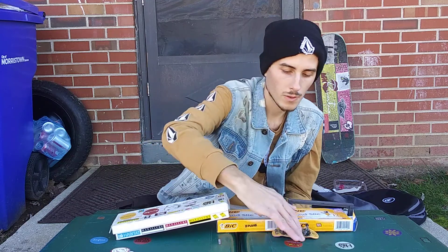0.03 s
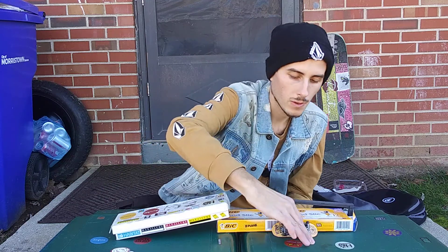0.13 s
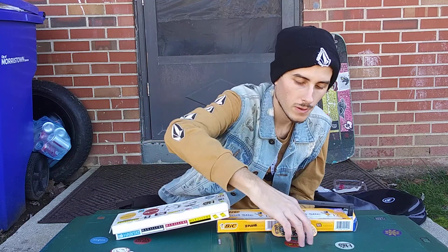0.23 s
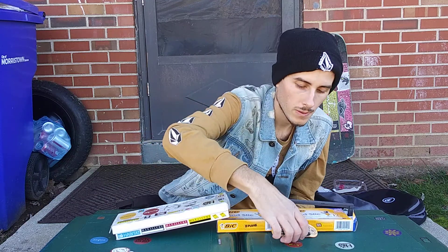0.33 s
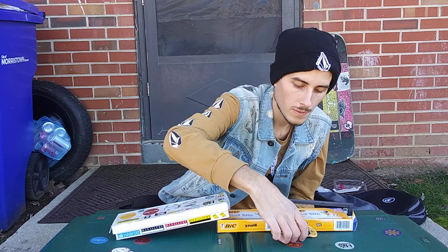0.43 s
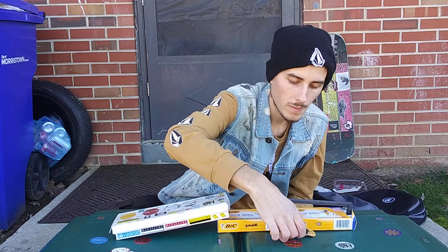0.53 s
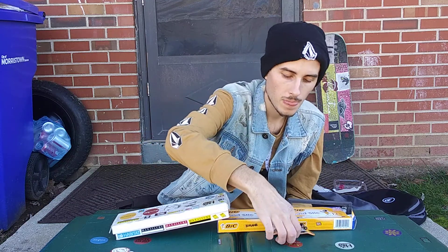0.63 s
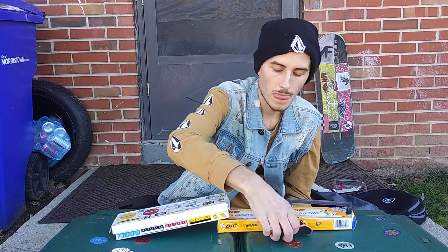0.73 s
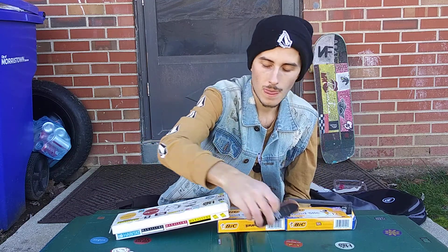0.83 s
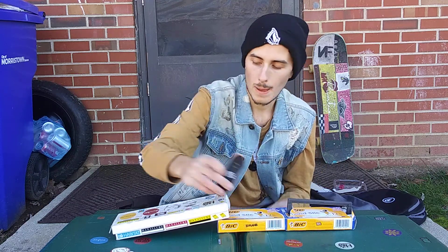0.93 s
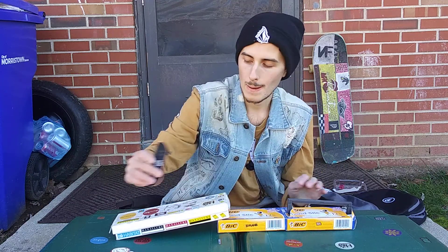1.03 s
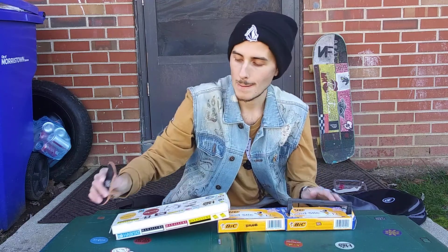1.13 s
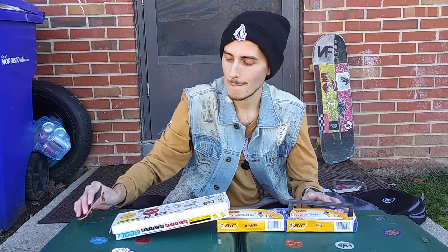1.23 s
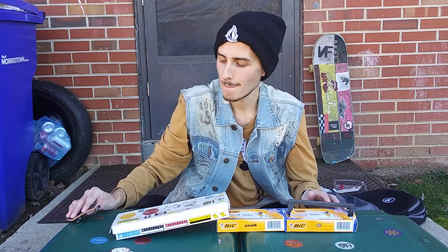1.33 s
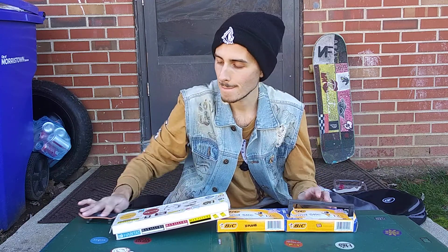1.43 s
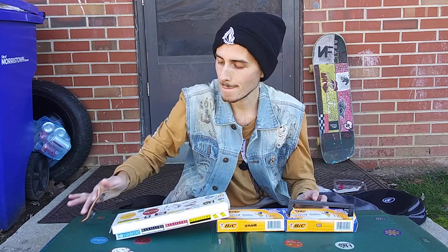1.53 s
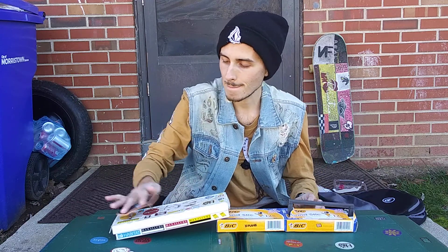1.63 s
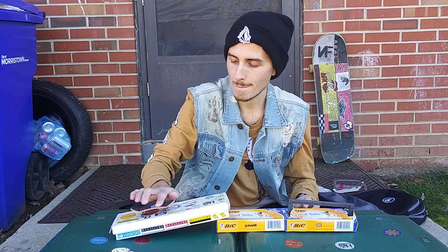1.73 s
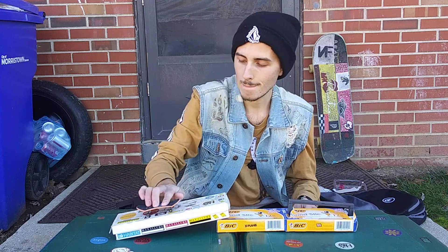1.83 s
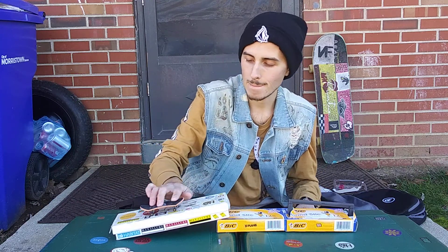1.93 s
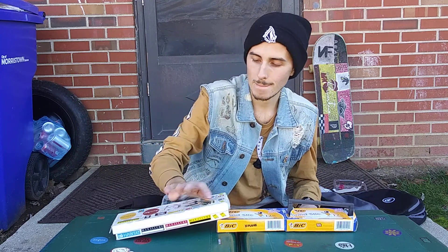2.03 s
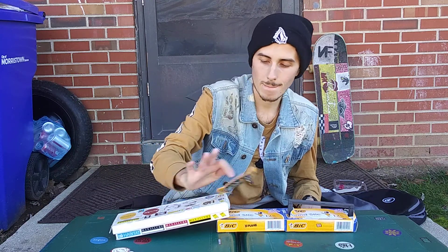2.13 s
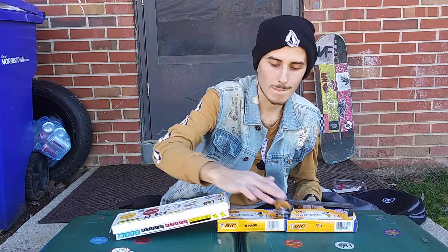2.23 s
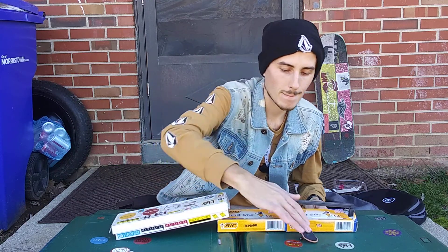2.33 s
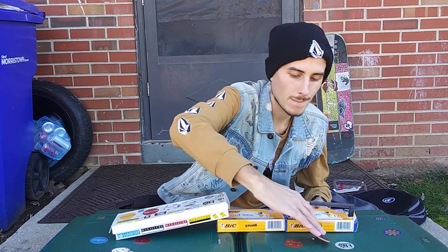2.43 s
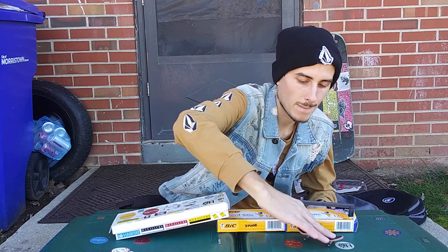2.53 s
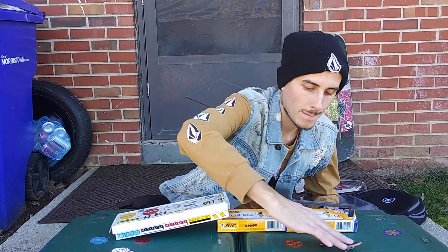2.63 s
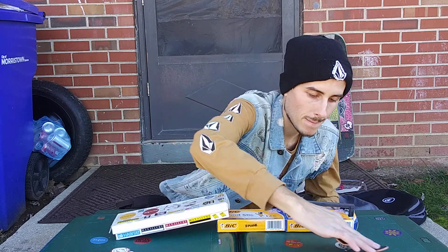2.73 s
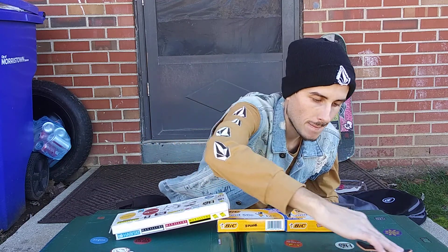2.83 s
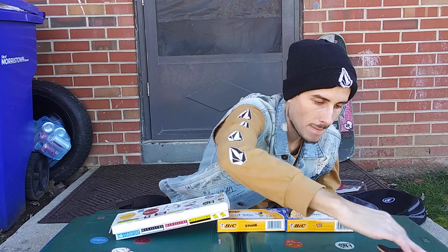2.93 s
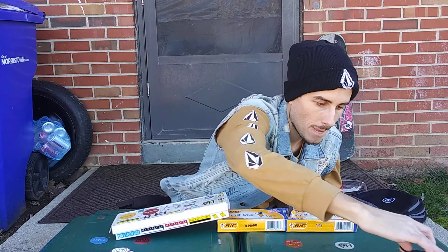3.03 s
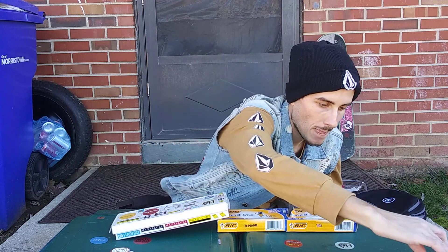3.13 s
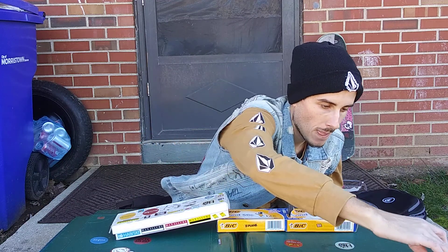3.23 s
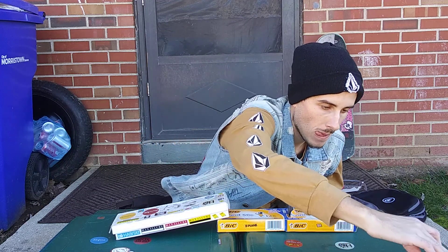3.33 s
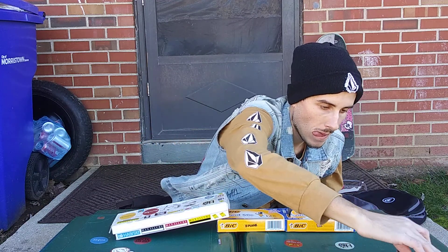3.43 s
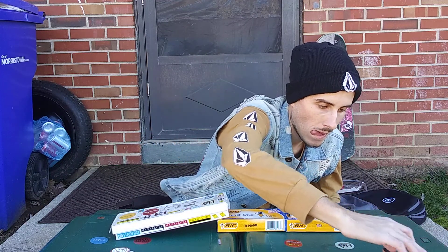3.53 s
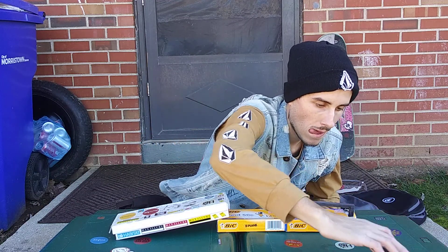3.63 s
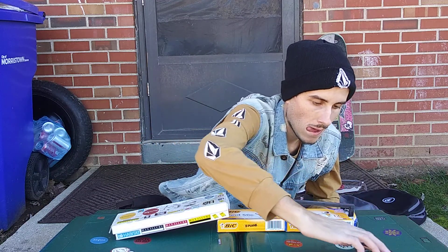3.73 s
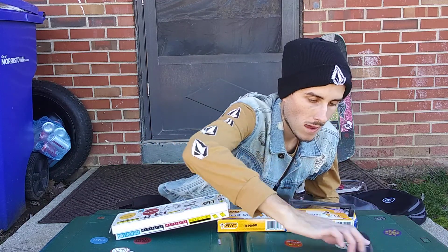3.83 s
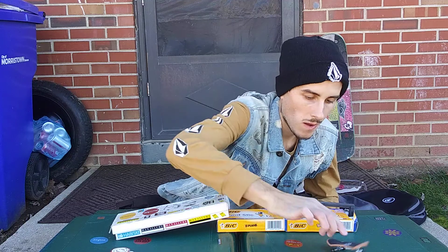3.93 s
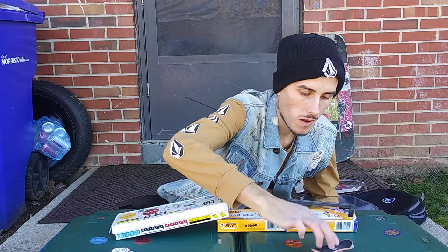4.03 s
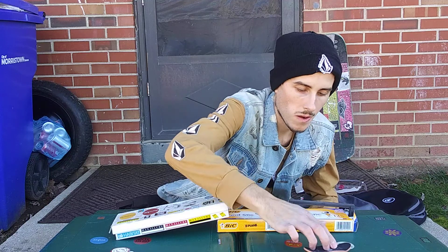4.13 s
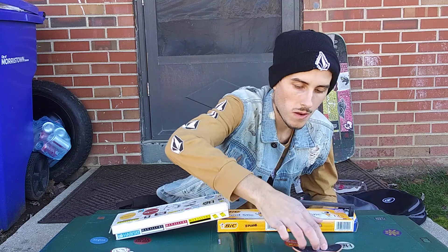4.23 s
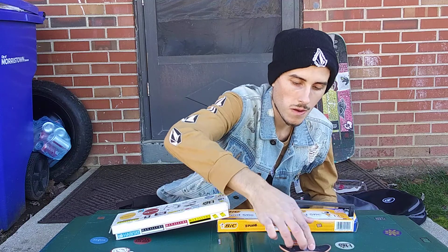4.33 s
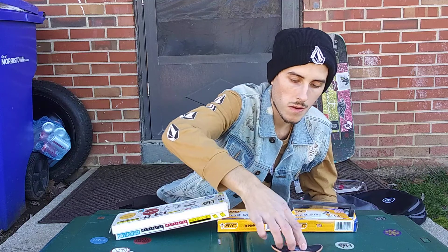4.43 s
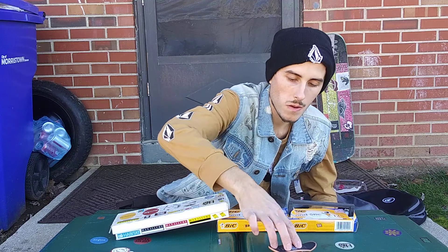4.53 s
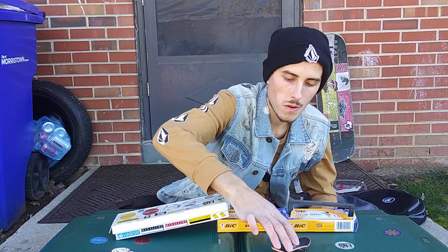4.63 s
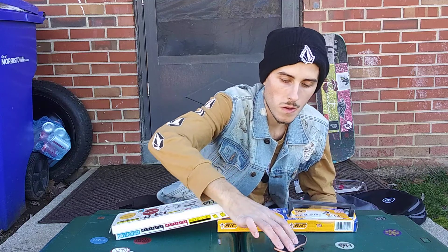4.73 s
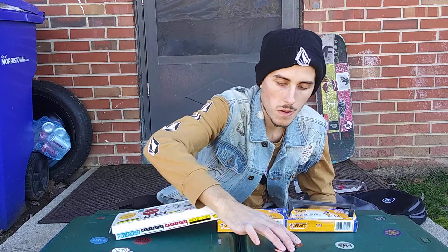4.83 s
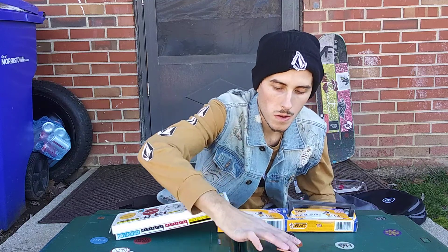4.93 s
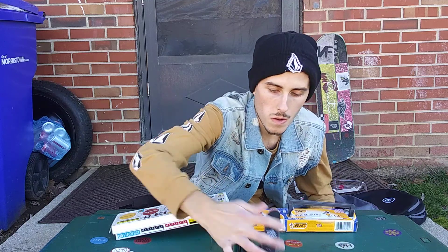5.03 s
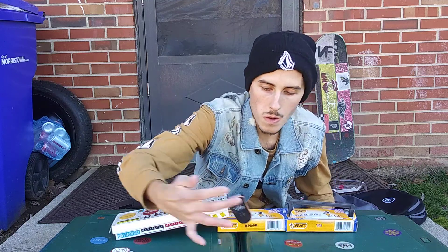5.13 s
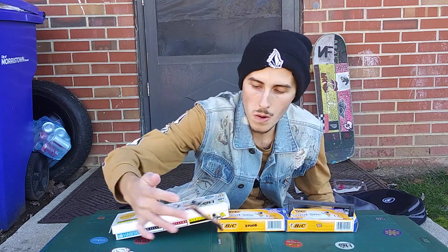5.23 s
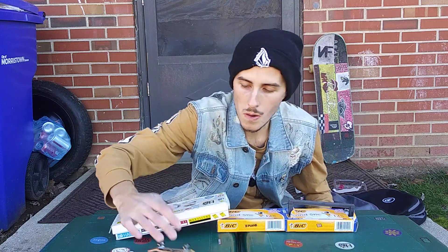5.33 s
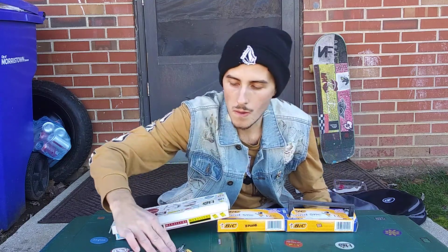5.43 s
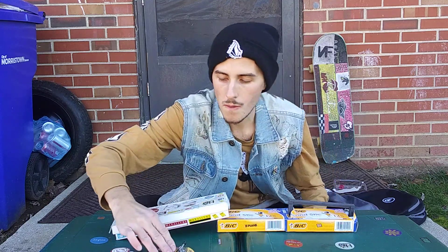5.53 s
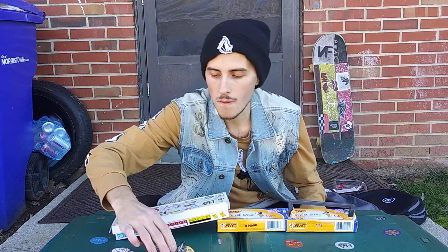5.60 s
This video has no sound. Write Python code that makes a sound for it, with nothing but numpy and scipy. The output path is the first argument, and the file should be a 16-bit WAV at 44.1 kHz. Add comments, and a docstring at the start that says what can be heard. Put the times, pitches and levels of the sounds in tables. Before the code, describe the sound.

Sharp dry clicks and hollow knocks of a fingertip-driven toy skateboard, broken by short gritty rolls, on a quiet porch with faint chirps.

```python
"""On a porch, a toy skateboard is flicked, slid and rolled over a hollow plastic lid and cardboard boxes.
Each blow is a sharp contact with a dying rattle that rings lid, box, deck and axles as sums of modes.
Rolling and scuffing drive the same bodies with continuous grit. Brick walls return a short echo.
Small birds whistle as gliding sines; a far motor hums and drones over a wash of shaped noise."""
import sys
import numpy as np
from scipy import signal
from scipy.fft import rfft, irfft
from scipy.io import wavfile
from scipy.ndimage import uniform_filter1d

SR = 44100
rng = np.random.default_rng(int(sys.argv[2]) if len(sys.argv) > 2 else 0)


def wav_record(signal):
    """Record a signal, one row per channel, as 16-bit PCM in the file named by sys.argv[1]."""
    frames = np.transpose(np.atleast_2d(signal))
    bounded = np.clip(frames, -1, 1)
    # unit amplitude maps onto the largest positive 16-bit level
    quanta = np.round(bounded * 32767).astype(np.int16)
    wavfile.write(sys.argv[1], SR, quanta)


N = 249862
SPAN = 8192  # samples in each body's answer

# damped modes of the hollow plastic lid: pitch_hz, level_db, t60_s
LID = [(150, -5, .08), (216, 0, .09), (281, 0, .09), (340, -4, .06), (385, -2, .07), (440, -4, .06)]
# damped modes of the cardboard box: pitch_hz, level_db, t60_s
BOX = [(525, 0, .06), (620, -2, .045), (700, -5, .04), (800, -1, .045), (940, -1, .04), (1050, -3, .035)]
# damped modes of the board's deck: pitch_hz, level_db, t60_s
DECK = [(1300, -4, .022), (1490, -1, .022), (1750, -3, .02), (1930, -3, .02), (2200, -1, .02),
        (2480, -2, .018), (2700, -3, .016), (3100, -1, .014), (3500, -1, .012), (3900, -3, .01),
        (4250, -5, .008)]
# damped modes of the metal axles: pitch_hz, level_db, t60_s
AXLES = [(5400, -1, .012), (5900, -4, .008), (6600, -1, .008), (7150, 0, .008), (7800, -3, .006),
         (8500, -5, .005)]
# damped modes of the smallest parts: pitch_hz, level_db, t60_s
TICK = [(10090, -8, 0.0033), (11050, -22, .01), (14600, -22, 0.014), (15800, -9, .012)]
# the five sounding bodies, lid to tick: modes, low_edge_hz, high_edge_hz
BODIES = [(LID, 130, 480), (BOX, 480, 1100), (DECK, 1100, 4400), (AXLES, 5000, 9300), (TICK, 9500, 16000)]
# basic level of the unringing crack in each body's answer, lid to tick: level_db
CRACK_LEVELS = [-21, -7.5, -2.5, -11.5, 3.5]


def undb(db):
    """Decibel law: an amplitude gain from its level."""
    return 10 ** (np.asarray(db) / 20)


def level(x, rms_db):
    """Mean-square power: scale a signal to a given rms."""
    return x * undb(rms_db) / np.sqrt(np.mean(x ** 2))


def fade(t60_s, count):
    """Exponential damping: a fall of 60 dB in each t60, one row for each."""
    t60_s = np.maximum(np.reshape(t60_s, (-1, 1)), 1e-3)
    return np.exp(-np.log(1000) * np.arange(count) / SR / t60_s)


def walk(rate_hz):
    """Slow random modulation: normal draws at the given rate joined by straight slopes."""
    hold = int(SR / rate_hz)
    steps = np.repeat(rng.standard_normal(N // hold + 1), hold)
    return uniform_filter1d(steps, hold)[:N]


def grit(shape, spread_db):
    """Rough contact: a random click on every sample, most small, a few large."""
    return rng.standard_normal(shape) * undb(spread_db * rng.exponential(size=shape))


def favour(hz, spot_hz, spot_db, width):
    """Modal coupling: extra strength of the modes near the pitch that a contact spot drives best."""
    return spot_db * np.exp(-(np.log(hz / spot_hz) / width) ** 2)


def ring(body, mode_db, crack_db):
    """Modal superposition: spectra of a body's answer to a click, one row for each set of mode levels."""
    modes, low_hz, high_hz = body
    hz, db, t60_s = np.transpose(modes)
    t = np.arange(SPAN) / SR
    sines = np.cos(2 * np.pi * hz[:, None] * t) * fade(t60_s, count=SPAN)
    sines /= np.sqrt(np.sum(sines ** 2, axis=1, keepdims=True))
    edges = signal.butter(3, [low_hz, high_hz], "bandpass", fs=SR, output="sos")
    band = signal.sosfreqz(edges, np.fft.rfftfreq(SPAN, 1 / SR), fs=SR)[1]
    # the unringing crack is a bare click, made up for the energy that the band removes
    crack = undb(crack_db + 10 * np.log10(SR / (high_hz - low_hz)))
    return band * (rfft(undb(db + mode_db) @ sines) + crack)


def blows():
    """Impact excitation: a sharp contact and a dying rattle drive every body; each spot favours other modes."""
    # blows of the board; body levels are against the deck: start_s, deck_peak_db, lid_db, box_db,
    # axles_db, tick_db, strongest_deck_ring_hz, strongest_hollow_ring_hz, rattle_t60_s
    blow_table = [(0.0229, -5, -10, -14, -11, -27, 1570, 370, 0.024),
                  (0.0561, -9, -6.5, -14.5, -6, -17.5, 2300, 207, 0.01),
                  (0.1244, -47, -12, -5, -21, -34, 1250, 1060, 0.034),
                  (0.1845, -20, -25, -10, -22, -31, 1280, 895, 0.02),
                  (0.2816, -38, -21, -5, -27, -42, 1440, 226, 0.016),
                  (0.3334, -46, -3, -3.5, -17, -33, 1150, 215, 0.037),
                  (0.3869, -49, 1, -10, -30, -32, 1105, 202, 0.037),
                  (0.4592, -50, 3.5, -3, -21, -32, 1270, 229, 0.054),
                  (0.568, -41.5, 3, 2, -7, -19, 2600, 285, 0.024),
                  (0.664, -49.5, -8, -3, -28, -32, 1350, 248, 0.03),
                  (0.7132, -33, -13, -15, -18, -44, 1260, 1010, 0.058),
                  (0.7674, -49.5, 0, -1, -19, -27, 1730, 237, 0.016),
                  (0.82, -30.5, -11.5, -13.5, -15, -26, 1080, 343, 0.022),
                  (0.8681, -61.5, 1.5, -11, -3, -24.5, 2240, 240, 0.03),
                  (0.963, -65, 5, -8, -5, -16, 1170, 236, 0.016),
                  (1.0526, -64, -5, -13, 14.5, -23, 1180, 237, 0.02),
                  (1.2486, -42.5, -13, -4.5, -8.5, -29, 2280, 1000, 0.055),
                  (1.2894, -51.5, -7, -3.5, -27, -29, 1280, 250, 0.032),
                  (1.392, -34.5, -20, -33, -1.5, -18, 1780, 482, 0.023),
                  (1.4396, -27.5, -12, -24, -16, -29, 3940, 452, 0.021),
                  (1.49, -17, -15, -12.5, -5.5, -20, 1750, 920, 0.063),
                  (1.5097, -20, -11, -5.5, -17, -24, 1830, 890, 0.074),
                  (1.5244, -11.5, -16.5, -13, -15, -27, 2130, 496, 0.04),
                  (1.569, -23.5, -15, -12, -12.5, -37, 1720, 1060, 0.056),
                  (1.584, -31, -20, -5, -11, -28, 1800, 437, 0.03),
                  (1.602, -19.5, -15.5, -34, -5, -22, 3130, 465, 0.011),
                  (1.708, -22, -18.5, -7, -9.5, -37, 2180, 950, 0.026),
                  (1.7259, -26, -10, 1, -8, -26, 2120, 910, 0.014),
                  (1.7411, -24.5, -6, 6, -10, -37, 1740, 528, 0.045),
                  (1.9007, -53, 3, 0.5, -29, -31.5, 1200, 235, 0.025),
                  (2.0597, -37, -14.5, 2.5, -26.5, -31.5, 1505, 638, 0.015),
                  (2.1, -38.5, -12, 4.5, -29, -34, 1580, 503, 0.014),
                  (2.1355, -32.5, -3, 12.5, -21.5, -36, 1130, 620, 0.059),
                  (2.3205, -17.5, -24, 0.5, -14.5, -26, 1300, 875, 0.03),
                  (2.3281, -14, -24.5, -19, -19, -36, 1110, 1048, 0.01),
                  (2.3655, -22, -18.5, -4.5, -14, -24, 1420, 770, 0.048),
                  (2.3792, -25.5, -12, 4.5, -7, -16, 1570, 912, 0.01),
                  (2.387, -13, -2, 0, -3, -12, 1770, 388, 0.019),
                  (2.4034, -24, -6, -0.5, -9.5, -19, 1580, 277, 0.058),
                  (2.4667, -30.5, -2, -8, -12.5, -21, 1200, 207, 0.043),
                  (2.5822, -36, 2, 3, -19, -12, 1100, 1020, 0.03),
                  (2.596, -10.5, -7, -10.5, -2.5, -15, 2700, 213, 0.017),
                  (2.7076, -34.5, 5.5, -13, -22, -37, 1500, 457, 0.017),
                  (3.0523, -36.5, -4, -8, 0.5, -3.5, 3370, 331, 0.055),
                  (3.0984, -34, -16, -26, -11, -18, 2350, 334, 0.022),
                  (3.1345, -38.5, -5, -14, -14, -31, 2160, 455, 0.09),
                  (3.1777, -34, -10, -20, -14.5, -29, 1680, 452, 0.04),
                  (3.236, -49, -10, -8.5, -7.5, -10, 1640, 240, 0.028),
                  (3.407, -50.5, -27, -21.5, -12, -24, 1600, 202, 0.035),
                  (3.4221, -31, -19.5, -15.5, -23.5, -26, 3370, 484, 0.02),
                  (3.4514, -49, -10, -13, -21, -34, 1720, 428, 0.033),
                  (3.5053, -39.5, -5, -9.5, -17.5, -29, 2470, 463, 0.09),
                  (3.5925, -48, -1, -8, -14, -28, 1910, 385, 0.054),
                  (3.6253, -37.5, -14, -7, -7, -19, 2250, 466, 0.038),
                  (3.6471, -26.5, -13, -22, -9.5, -17, 1930, 939, 0.03),
                  (3.8459, -38, -7.5, -24.5, -10, -35, 1340, 848, 0.043),
                  (3.9989, -33.5, -13, -11, -7, -20, 3640, 240, 0.056),
                  (4.0504, -11.5, -6.5, -7, -7.5, -18.5, 3900, 262, 0.02),
                  (4.0995, -17.5, -18, -14.5, -9, -20, 1770, 781, 0.017),
                  (4.1123, -28, -10, -7, -8, -15, 1750, 816, 0.088),
                  (4.133, -13, -12, -11.5, -9.5, -32, 4400, 277, 0.02),
                  (4.2032, -44, -32, 5, -14, -38, 1270, 880, 0.038),
                  (4.2097, -29, -14, -5, -21, -43, 1110, 850, 0.033),
                  (4.273, -46, -12, 4, -17, -36, 1470, 1080, 0.03),
                  (4.3804, -36, -29, 1.5, -11, -24, 1820, 910, 0.021),
                  (4.5998, -38.5, -7, -2, -21, -33, 2820, 961, 0.034),
                  (4.7694, -47.5, -11, -14, -28, -32, 2190, 238, 0.027),
                  (4.8468, -50, -10, -14, -23, -33, 1510, 203, 0.038),
                  (4.9771, -43, -24, -15, -2.5, -24, 1700, 232, 0.033),
                  (5.0714, -33, 3.5, -17, -2, -25, 1500, 384, 0.011),
                  (5.0859, -17.5, -10, -7.5, -7, -16, 1620, 420, 0.026),
                  (5.115, -17.5, -6, -19, -6.5, -28, 2200, 394, 0.014),
                  (5.3916, -23, -7.5, -6.5, -14, -25, 3530, 970, 0.048),
                  (5.4143, -10.5, -6.5, -19.5, -4, -16.5, 1800, 436, 0.024),
                  (5.4235, -24, 1.5, -4.5, -6.5, -22, 3220, 218, 0.073),
                  (5.4535, -32.5, -17, -26, 0, -14, 2700, 294, 0.015),
                  (5.4631, -13.5, -13, -9, -14, -22, 3280, 960, 0.062),
                  (5.474, -9, -10, -10, -7, -28, 2170, 202, 0.019),
                  (5.4917, -29.5, -11, 0, -0.5, -30, 2020, 536, 0.017)]
    start_s, deck_db, lid, box, axles, tick, deck_hz, hollow_hz, rattle_s = np.transpose(blow_table)
    # upper deck modes against lower ones: -6.5 dB at an 1800 Hz deck ring, rising 13 dB per octave
    hard_db = -6.5 + 13 * np.log2(deck_hz / 1800.0)
    # the loose board chatters on faintly beneath the first rattle
    shake = fade(rattle_s, count=SPAN) + undb(-24.0) * fade(0.087, count=SPAN)
    push = shake * grit((len(start_s), SPAN), 2.3)
    push[:, 0] += 4.0  # sharp first contact
    push = rfft(push)
    hits = 0
    for body, crack_db, body_db in zip(BODIES, CRACK_LEVELS, (lid, box, 0, axles, tick)):
        hz = np.array(body[0])[:, 0]
        spot_db = favour(hz, deck_hz[:, None], 8, 0.12) + favour(hz, hollow_hz[:, None], 7, 0.15)
        # a harder contact reaches the upper modes of the deck
        upper = np.clip(np.log2(hz / 1600), 0, 1) * (body[0] == DECK)
        spot_db = spot_db + hard_db[:, None] * upper
        crack_db = crack_db + hard_db[:, None] * upper.max() / 2
        mode_db = spot_db + 2.5 * rng.standard_normal(spot_db.shape)
        part = irfft(push * ring(body, mode_db, crack_db))
        # peak of a sine as strong as the loudest 256 samples
        strength = np.sqrt(2 * uniform_filter1d(part ** 2, size=256).max(axis=1))
        hits = hits + part * (undb(deck_db + body_db) / strength)[:, None]
    out = np.zeros(N + SPAN)
    for start, hit in zip((start_s * SR).astype(int), hits):
        out[start:start + SPAN] += hit
    return out[:N]


def contacts():
    """Contact envelopes: level curves of the long rolls, and a rise and fall in dB for each scuff."""
    # long rolls over the lid; body levels are against the deck: time_s, deck_rms_db, lid_db, box_db, metal_db
    rolls = [
        [(2.615, -28.5, 8, -1, -12), (2.635, -42, 3, 2.5, -4.5), (2.713, -35, -2, -2.5, -20),
         (2.79, -37.5, -6, 5.5, -10), (2.869, -37, -7, 2.5, -17.5), (3.047, -39.5, -5.5, 0, -15.5),
         (3.077, -47, 3.5, -2.5, -22), (3.191, -49.5, -13.5, -9, -10), (3.25, -70, 3, -6, -16)],
        [(3.32, -63.5, 4.5, -4, -17), (3.436, -60.5, -3, -3.5, -26), (3.616, -43.5, -9.5, -12, -16),
         (3.692, -39, -11, -3.5, -21), (3.8, -38, -7, 1.5, -16), (3.836, -43, -2.5, 7, -17),
         (3.9, -29.5, -14, 0.5, -6.5), (3.96, -28, -12, -9, -6.5), (3.975, -43.5, -8, -12, -2),
         (4.032, -59, -10.5, -10, 9.5)],
        [(4.234, -64.5, 19, 9, -30), (4.252, -45, -7.5, 3, -23.5), (4.41, -42.5, -5, -0.5, -16.5),
         (4.43, -54, 4, 4, -8), (4.49, -50, -8, -4, -8), (4.572, -55.5, 4, 3.5, -11.5),
         (4.664, -43.5, -16, -6.5, -8.5), (4.69, -48, 1, -8.5, -9), (4.75, -64.5, -14, 3.5, -22.5)],
    ]
    # short scuffs and slides; body levels are against the deck:
    # loudest_s, deck_rms_db, lid_db, box_db, metal_db, swell_s, fade_s
    scuff_table = [(0.001, -36, 1, -0.5, -5.5, 0.012, .016), (0.022, -32, -10.5, -8.5, -22, .007, .005),
                   (0.13, -54, -5.5, 4, -13.5, 0.069, .15), (0.187, -38.5, 3.5, -24, -4.5, 0.025, .03),
                   (0.3, -61.5, 0, -7, -13.5, 0.11, .9), (0.578, -57.5, 11.5, 4, -16, 0.21, .1),
                   (0.716, -57, -11, 8, -13, 0.061, .036), (0.826, -45.5, 5, -2, -13, 0.078, .018),
                   (1.245, -53, -10, -0.5, -15, 0.012, .16), (1.499, -32, -20.5, -3, -17.5, 0.013, .15),
                   (1.55, -50, -21.5, -7.5, -1, 0.11, .11), (1.705, -28, -2, -5, -15, 0.0027, .01),
                   (1.75, -38.5, 0, 6, -16, 0.065, .056), (2.07, -56.5, 2, 6, -12, 0.031, .3),
                   (2.131, -60, -13, 8, -19, 0.3, .02), (2.306, -57, -15, -16, 7, .003, 0.0068),
                   (2.328, -30.5, -1, 4.5, -6, .01, .07), (2.385, -35, -6.5, 8, -7.5, 0.015, .005),
                   (2.41, -54, -3, 10, -5, 0.017, .2), (2.471, -47, 13, -3.5, -13, 0.073, .15),
                   (2.588, -29, -12.5, 5.5, -11, 0.025, .03), (4.044, -39, -2.5, 0, 0, 0.017, .005),
                   (4.15, -37.5, -0.5, 1.5, -11.5, .01, .044), (4.211, -46.5, 2.5, 10, -26, 0.059, .038),
                   (4.861, -57.5, -9.5, -9, -25, 0.11, .1), (5.021, -46, 1, -2.5, -15, 0.045, 0.062),
                   (5.06, -69.5, 0, 2, -24.5, 0.11, .03), (5.08, -36.5, 5, -3, -3, 0.014, .1),
                   (5.116, -25.5, -21.5, -32, -4, 0.059, .008), (5.5, -46, -4, -3, 6.5, .01, .026),
                   (5.581, -56, -4.5, -8, -14, 0.23, .1)]
    range_db = 30  # rise in the swell and fall in the fade
    scuffs = []
    for peak_s, db, *mix, swell_s, fade_s in scuff_table:
        begin = (peak_s - swell_s, db - range_db, *mix)
        end = (peak_s + max(fade_s, 1e-3), db - range_db, *mix)
        scuffs.append([begin, (peak_s, db, *mix), end])
    return map(np.transpose, rolls + scuffs)


def rolling():
    """Continuous excitation: grit under wheels and deck shakes the bodies, more unevenly for small parts."""
    # modes favoured where the wheels press on the lid: pitch_hz, gain_db
    track = [(900, 15), (1530, 7), (1950, 4), (7100, 2)]
    tilt_db = -1.5  # per octave above a body's lowest mode
    tick_db = -11  # smallest parts against the axles
    pressed_t60_s = 0.045  # fingers pressing on the board damp every ring
    t, out = np.arange(N) / SR, 0
    pressure = undb(1.5 * walk(60) + 2.2 * walk(220))
    grain = np.minimum(rng.exponential(size=N), 7)
    # the loose metal parts buzz in fits
    fits_db = 3.5 * walk(25)
    columns = (2, 3, 1, 4, 4)  # where each body's level stands in the contact curves
    spreads_db = (2.0, 2.5, 3.0, 4.2, 5.0)
    for body, crack_db, column, spread_db in zip(BODIES, CRACK_LEVELS, columns, spreads_db):
        gain = 0
        for curve in contacts():
            db = curve[1] + (curve[column] if column > 1 else 0) + tick_db * (body[0] == TICK)
            gain = gain + undb(np.interp(t, curve[0], db, left=-200, right=-200))
        gain = gain * undb(fits_db * (column == 4))
        gain = uniform_filter1d(gain, size=200)
        hz = np.array(body[0])[:, 0]
        track_db = sum(favour(hz, spot_hz, spot_db, 0.2) for spot_hz, spot_db in track)
        track_db = track_db + tilt_db * np.log2(hz / hz[0])
        # the wheels wander between spots that drive alternate modes, so the colour shifts as they travel
        spots_db = 3.5 * (-1) ** np.arange(len(hz)) * np.array([[1], [-1]])
        place = np.pi / 4 * (1 + np.tanh(walk(9)))
        answers = irfft(ring(body, track_db + spots_db, crack_db - 3))
        for answer, share in zip(answers, (np.cos(place), np.sin(place))):
            answer = answer * fade(pressed_t60_s, count=SPAN)[0]
            contact = pressure * rng.standard_normal(N) * undb(spread_db * grain)
            shaken = signal.fftconvolve(contact * share * gain, answer)[:N]
            out = out + shaken / np.sqrt(np.mean(contact ** 2) * np.sum(answer ** 2))
    return out


def porch_echo(toy):
    """Diffuse reflection: dull decaying noise off the brick, convolved with the toy after a short delay."""
    t60_s, echo_db, dull_hz, delay_s = 0.11, -17, 3480, 0.0048
    noise = rng.standard_normal(2 * SPAN)
    dull = signal.lfilter([1], [1, -np.exp(-2 * np.pi * dull_hz / SR)], noise)
    echo = dull * fade(t60_s, count=2 * SPAN)[0]
    echo = echo / np.sqrt(np.sum(echo ** 2))
    echo = np.concatenate([np.zeros(int(delay_s * SR)), echo])
    return undb(echo_db) * signal.fftconvolve(toy, echo)[:N]


def birds():
    """Frequency modulation: whistled sines, the gliding ones unsteady, blurred by leaves and walls."""
    # bird notes, before the level flutters: start_s, length_s, from_hz, to_hz, level_db
    notes = [(0.295, 0.07, 3750, 5000, -60), (0.255, 0.04, 6000, 5850, -75), (0.38, .05, 3500, 2900, -68),
             (0.5, 0.035, 4000, 4000, -69), (0.5, .03, 5900, 5950, -73), (0.59, 0.04, 2900, 3500, -68),
             (0.63, 0.05, 3200, 3900, -66), (0.68, 0.03, 3700, 3200, -71), (.74, 0.05, 3300, 3000, -69),
             (0.85, 0.06, 3050, 3500, -70), (0.92, .05, 3750, 4200, -75), (4.77, 0.07, 2280, 2220, -64),
             (4.88, 0.1, 4700, 4590, -67), (4.96, 0.13, 4610, 4580, -73), (5.215, 0.075, 2230, 2210, -63.5),
             (5.33, 0.09, 4650, 4550, -74)]
    out, warble = np.zeros(N), walk(120)
    for start_s, length_s, from_hz, to_hz, db in notes:
        n, i = int(length_s * SR), int(start_s * SR)
        flutter = warble[i:i + n]
        depth = 0.12 * abs(np.log(to_hz / from_hz))  # wider glides waver more
        pitch_hz = np.linspace(from_hz, to_hz, n) * (1 + depth * flutter)
        phase = 2 * np.pi * np.cumsum(pitch_hz) / SR
        out[i:i + n] += undb(db + 3.0 * flutter) * np.sqrt(np.hanning(n)) * np.sin(phase)
    blur = rng.standard_normal(SPAN) * fade(0.1, count=SPAN)[0]
    blur = blur / np.sqrt(np.sum(blur ** 2))
    return out + undb(-1.5) * signal.fftconvolve(out, blur)[:N]


def motor():
    """Tonal radiation: a far motor's hum, a sine of wavering pitch and level."""
    # course of the hum about which it wavers: time_s, pitch_hz, rms_db
    hum_table = [(2.45, 94, -53), (3.47, 95, -57.5), (3.94, 98.3, -58), (4.4, 101, -57.5),
                 (4.5, 101.5, -50), (5.66, 102.7, -62)]
    time_s, hum_hz, hum_db = np.transpose(hum_table)
    t = np.arange(N) / SR
    pitch_hz = np.interp(t, time_s, hum_hz) + 2.5 * walk(14)
    phase = 2 * np.pi * np.cumsum(pitch_hz) / SR
    rms_db = np.interp(t, time_s, hum_db, left=-70) + 2.2 * walk(12)
    return np.sqrt(2) * undb(rms_db) * np.sin(phase)


def drone():
    """Resonant filtering: noise narrowed to a steady drone above the hum."""
    centre_hz, width_hz = 238, 10
    f = np.fft.rfftfreq(N, 1 / SR)
    peak = 1 / (1 + (2 * (f - centre_hz) / width_hz) ** 2)
    return level(irfft(rfft(rng.standard_normal(N)) * peak, N), -60.5)


def traffic_wash():
    """Spectral shaping: noise weighted to a distant traffic wash, its level gently wavering."""
    # relative spectrum of the outdoor air: pitch_hz, level_db (per Hz)
    air = [(25, -18.5), (60, -7.5), (100, 3.5), (230, -7.5), (550, -15), (900, -21), (2000, -28),
           (3900, -33.5), (4700, -50), (6200, -36.5), (9000, -41.5), (15500, -40), (16500, -60)]
    f = np.fft.rfftfreq(N, 1 / SR)
    hz, db = np.transpose(air)
    shape = undb(np.interp(np.log(f + 1), np.log(hz), db))
    wash = irfft(rfft(rng.standard_normal(N)) * shape, N)
    return level(wash, -54.5) * undb(1.6 * walk(6))


def scene():
    """Linear superposition: the toy and its echo, the birds and the outdoor air."""
    toy = blows() + rolling()
    outdoors = traffic_wash() + drone() + motor()
    return (toy + porch_echo(toy) + birds() + outdoors)[None]


def record(dry):
    """Saturation and band limiting: rounds the loudest peaks, thins the deep bass and cuts the top."""
    low_hz, top_hz = 54, 16600
    rounded = np.tanh(0.95 * dry) / 0.95
    thin = signal.sosfilt(signal.butter(2, low_hz, "highpass", fs=SR, output="sos"), rounded)
    return signal.sosfilt(signal.ellip(10, 0.2, 70, top_hz, fs=SR, output="sos"), thin)


dry = scene()
out = record(dry)
wav_record(out)
```